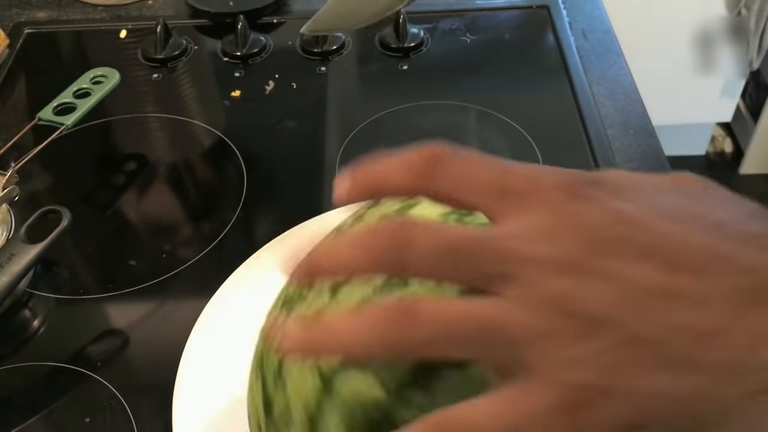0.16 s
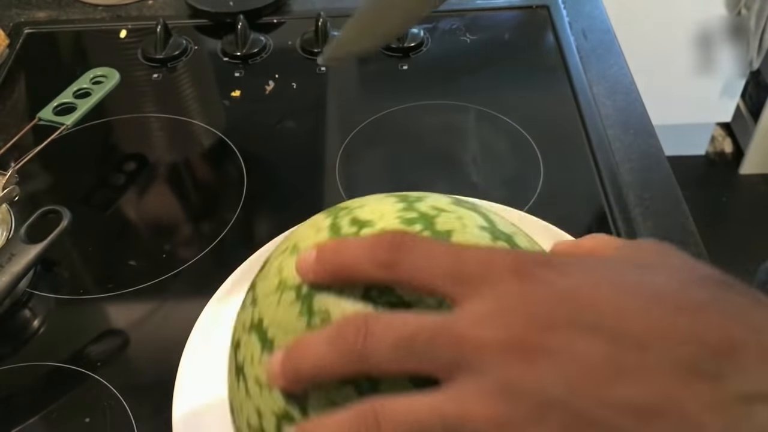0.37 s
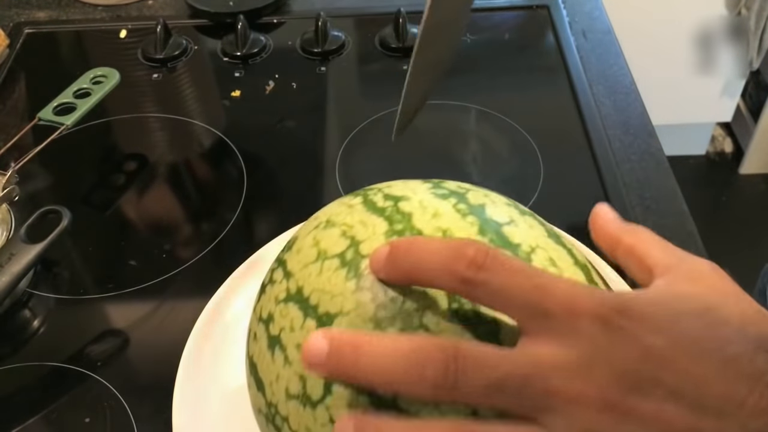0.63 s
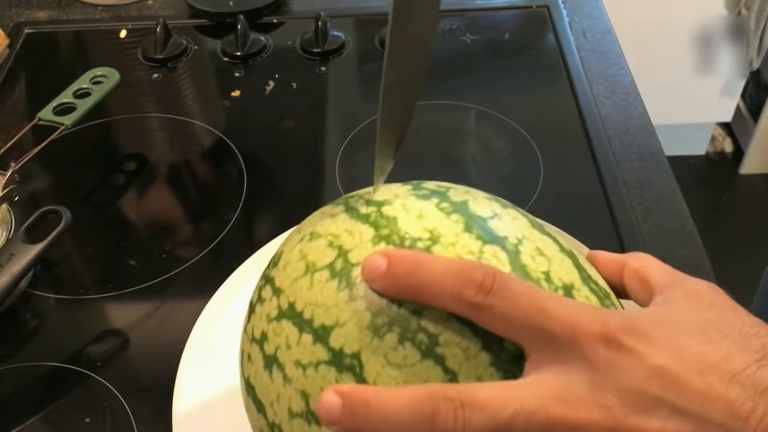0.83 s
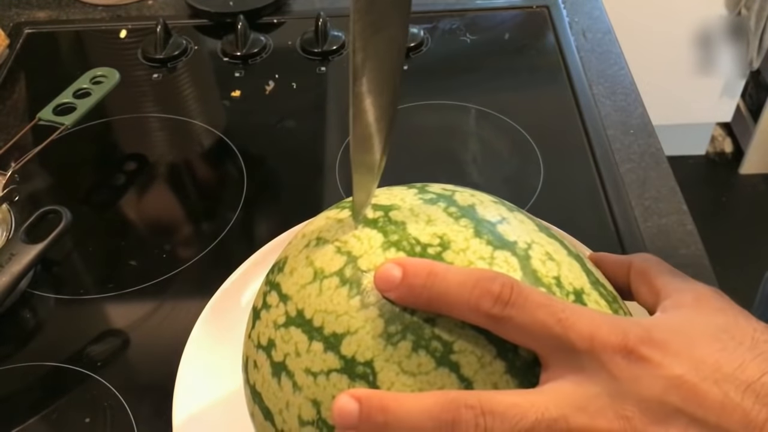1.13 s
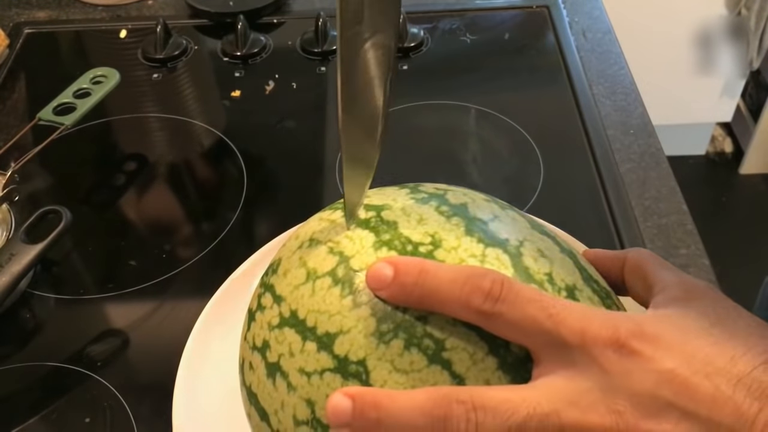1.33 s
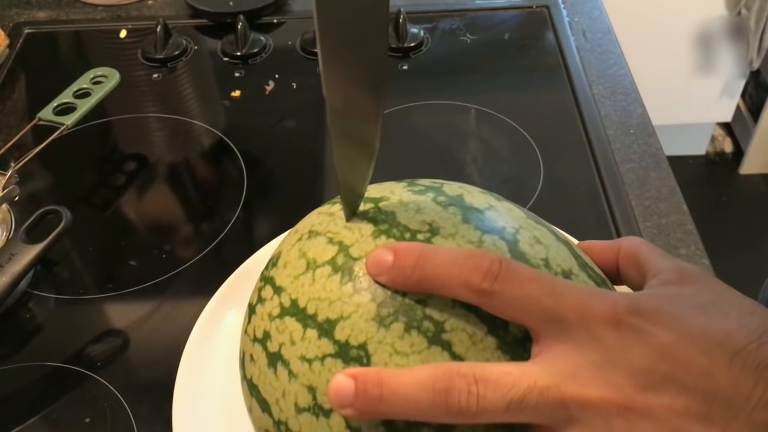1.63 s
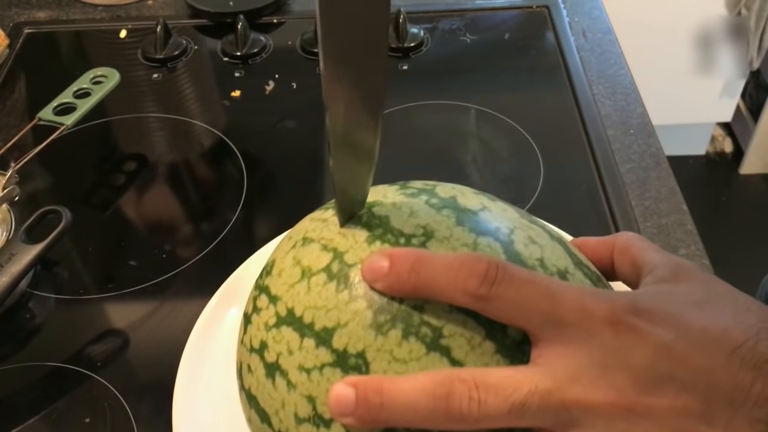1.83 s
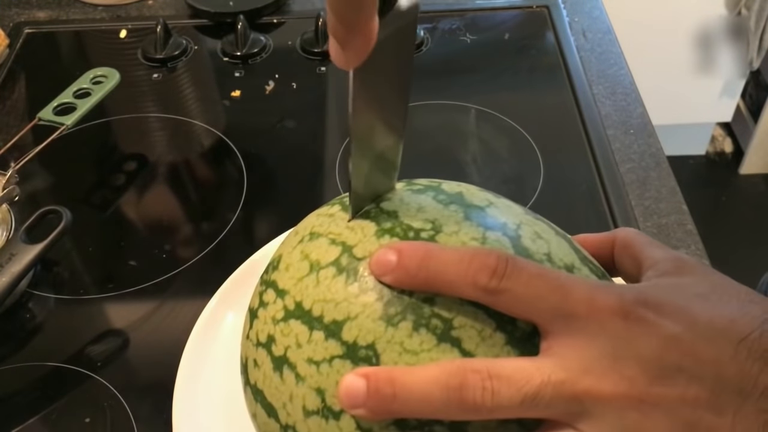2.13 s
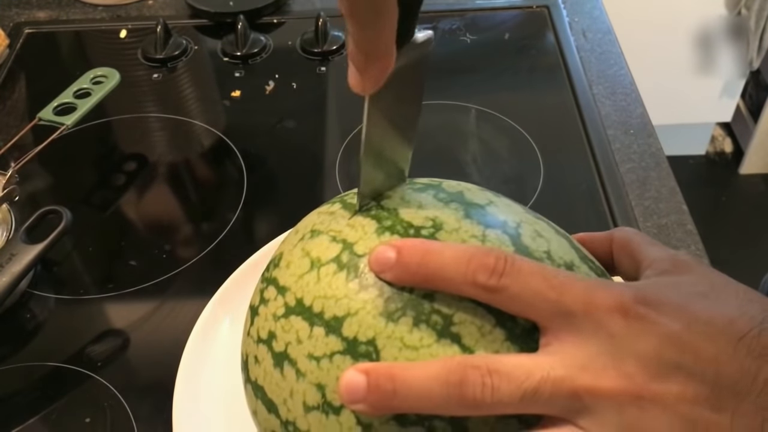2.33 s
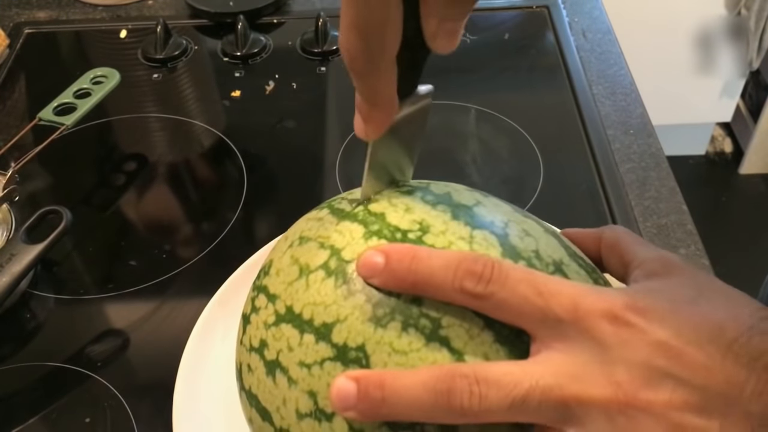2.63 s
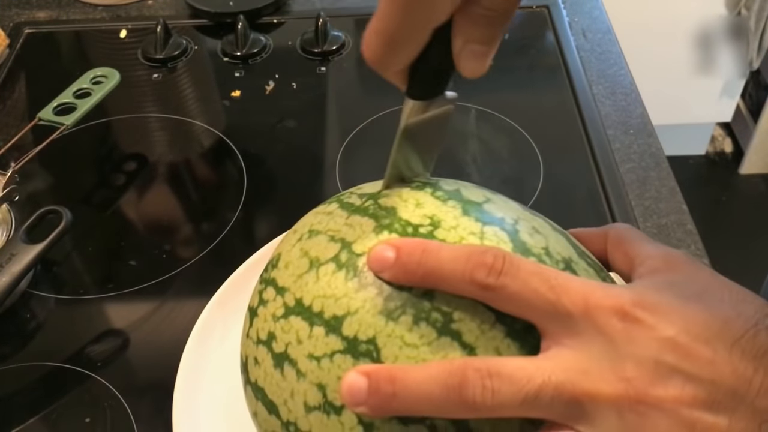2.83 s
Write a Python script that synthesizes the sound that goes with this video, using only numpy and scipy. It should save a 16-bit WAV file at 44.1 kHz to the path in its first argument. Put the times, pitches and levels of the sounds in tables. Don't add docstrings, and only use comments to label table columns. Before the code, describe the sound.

Wet, crisp crunches of a knife cutting watermelon rind, after dull plate thuds and light blade ticks

```python
import sys
import numpy as np
from scipy import signal
from scipy.fft import rfft, irfft, next_fast_len
from scipy.io import wavfile
from scipy.ndimage import uniform_filter1d, map_coordinates

SR = 44100
rng = np.random.default_rng(int(sys.argv[2]) if len(sys.argv) > 2 else 0)


def makeup_ratio(level_db):
    decades = np.asarray(level_db, float) / 20
    return 10 ** decades


def generate_wav(sig):
    pcm = np.round(np.clip(np.atleast_2d(sig).T, -1, 1) * 32767).astype(np.int16)
    wavfile.write(sys.argv[1], SR, pcm)


N = 131859
T = np.arange(N) / SR


def unit(x):
    return x / np.sqrt(np.mean(x ** 2) + 1e-20)


def along(points, hz):
    point_hz, value = np.transpose(points)
    return np.interp(np.log(hz + 1), np.log(point_hz + 1), value)


def wobble(rate):
    return map_coordinates(rng.standard_normal(int(N * rate / SR) + 4), [T * rate])


def filtered(x, response):
    size = next_fast_len(len(x) + 8192)
    return irfft(rfft(x, size) * response(np.fft.rfftfreq(size, 1 / SR)), size)[:len(x)]


def noise(spectrum, size):
    return unit(filtered(rng.standard_normal(size), lambda hz: makeup_ratio(along(spectrum, hz))))


def ring(modes, t, chance, spread_db):
    total = 0
    for k, ((hz, db, t60), c) in enumerate(zip(modes, chance)):
        decay = makeup_ratio(db + spread_db * c - 60 * t / t60)
        total = total + (-1) ** k * decay * np.sin(2 * np.pi * hz * t)
    return total


def add(track, s, x):
    part = track[round(s * SR):][:len(x)]
    part += x[:len(part)]


# time_s, level_db
RUMBLE_LEVEL = [(0.0, -37.5), (0.13, -29.5), (0.18, -45), (0.43, -27.5), (0.49, -32), (0.77, -43),
                (0.81, -23.5), (0.98, -50), (1.02, -22.5), (1.17, -36), (2.31, -31.5), (2.41, -22.5),
                (2.44, -36), (2.5, -24.5), (2.78, -26), (2.81, -39.5), (2.9, -22.5), (2.99, -32)]
# freq_hz, level_db (per Hz)
RUMBLE_COLOUR = [(12, -61), (20, -26), (36, -13), (59, 6), (72, 0), (86, -8), (124, -8.5), (200, -31),
                 (260, -70), (440, -120)]
# freq_hz, level_db (per Hz)
HISS_COLOUR = [(120, 0), (200, 1.5), (500, -5.5), (1100, -3), (2300, -12), (3000, -18.5), (6000, -22.5),
               (15800, -27)]
DRONE_HZ, DRONE_WANDER_HZ, DRONE_DB = 52.8, 4.1, 3
HISS_DB, HISS_SWAY_DB = -44.5, 0.5


def room_tone():
    time_s, level_db = np.transpose(RUMBLE_LEVEL)
    drone_hz = DRONE_HZ + DRONE_WANDER_HZ * wobble(9)
    drone = np.sqrt(2) * np.sin(2 * np.pi * np.cumsum(drone_hz) / SR)
    low = makeup_ratio(DRONE_DB) * drone + 0.84 * noise(RUMBLE_COLOUR, N)
    hiss = makeup_ratio(HISS_DB + HISS_SWAY_DB * wobble(6.28)) * noise(HISS_COLOUR, N)
    return makeup_ratio(np.interp(T, time_s, level_db)) * low + hiss


# freq_hz, t60_s
KITCHEN_DECAY = [(150, 0.62), (2000, 0.27), (10000, 0.23)]


def kitchen(x):
    hz, t, bins = signal.stft(rng.standard_normal(SR // 2), SR, nperseg=256)
    decay = makeup_ratio(-60 * t / along(KITCHEN_DECAY, hz)[:, None])
    tail = signal.istft(bins * decay, SR, nperseg=256)[1]
    delayed = np.pad(x, (200, 0))
    return signal.fftconvolve(delayed, tail / np.linalg.norm(tail))[:N]


# centre_s, half_width_s,
# level_db, colour_hz, colour_width_octaves
RUBS = [(.13, .035, -56, 10000, .9), (0.38, 0.098, -47.5, 1600, 1), (0.845, 0.053, -57, 5400, 1),
        (1.81, 0.055, -37, 800, 0.8), (1.83, .03, -45, 1170, .07), (1.86, .04, -45, 640, .15),
        (1.84, 0.048, -44, 224, 0.58), (2.36, 0.026, -37, 390, 0.76), (2.485, 0.023, -35.5, 350, 0.72),
        (2.80, 0.018, -43, 450, 0.37), (2.105, 0.018, -36.5, 410, .6), (0.61, 0.15, -39.5, 92, 0.38),
        (0.19, 0.16, -44.5, 105, 0.3), (2.88, 0.076, -44, 128, 0.36)]


def rubs():
    grain = makeup_ratio(2.1 * wobble(60.25))
    total = np.zeros(N)
    for centre, half_width, db, colour_hz, octaves in RUBS:
        colour = lambda hz: np.exp(-0.5 * (np.log2((hz + 1) / colour_hz) / octaves) ** 2)
        swell = np.exp(-0.5 * ((T - centre) / half_width) ** 2)
        total += makeup_ratio(db) * swell * unit(filtered(rng.standard_normal(N), colour))
    return grain * total


# start_s, level_db
TAPS = [
    (.815, -45),
    (.920, -36),
    (.952, -40),
    (1.052, -36),
]
# pitch_hz, level_db, t60_s
RIM = [(722, -1, 0.045), (2140, -1.5, 0.035), (2500, -8, .015), (3230, -9, 0.025), (3700, -15, .012)]


def taps():
    out, t = np.zeros(N), T[:SR // 8]
    for (s, db), c in zip(TAPS, rng.standard_normal((len(TAPS), len(RIM)))):
        roughness_db = 2.9 * noise([(300, -2), (900, -25), (2000, -90)], len(t))
        add(out, s, makeup_ratio(db + roughness_db) * ring(RIM, t, c, spread_db=1.5) * np.tanh(t / 0.0015))
    clink = ring([(561.6, 3.5, 0.24)], t, [0], spread_db=0)
    add(out, 0.098, makeup_ratio(-40.5) * clink * np.tanh(t / 0.004))
    return out


# start_s, level_db, scrape_s, ring_db, ring_tilt_db (per octave)
TICKS = [(.862, -54, .008, -14, 0), (1.019, -39, .02, -8, 2), (1.068, -62, .02, 6, -6),
         (1.262, -51, .02, -5, 3), (1.277, -46, .014, -5, 4), (1.463, -46, .015, -5, 4),
         (1.61, -55, .04, -3, 8), (1.635, -55, .03, -3, 8), (1.730, -46, .03, -12, 8),
         (1.754, -38, .008, -14, 8), (1.760, -32, .012, -16, 6), (1.946, -41, .016, -8, 6)]
# pitch_hz, level_db, t60_s
BLADE = [(5450, -4, .14), (5900, -9, .06), (6850, -4, .12), (7550, -8, .08), (8410, -5, .05),
         (9400, -2, .03), (10050, -5, .05), (11650, 2, .05), (13080, -2, .045), (13900, -1, .03),
         (14590, -9, .04), (15600, -3, .05)]


def ticks():
    out, t = np.zeros(N), T[:SR // 4]
    octaves = np.log2(np.array(BLADE)[:, 0] / 11000)
    for (s, db, scrape_s, ring_db, tilt_db), c in zip(TICKS, rng.standard_normal((len(TICKS), len(BLADE)))):
        scrape = noise([(2500, -42), (5000, -6), (15000, -9)], len(t)) * makeup_ratio(-26 * t / scrape_s)
        blade = ring(BLADE, t, c + tilt_db / 2 * octaves, spread_db=2)
        blade = blade * (1 - np.exp(-4 * t / scrape_s))
        blade = blade * makeup_ratio(3 * scrape / np.abs(scrape).max())
        add(out, s, makeup_ratio(db) * (scrape + makeup_ratio(ring_db) * blade))
    return out


# start_s, plate_db, boom_db, hardness_db (per octave)
KNOCKS = [
    (0.387, -7.5, -14, 2.5),
    (0.417, -25, -24, 7.5),
    (0.92, -32.5, -30, 0),
    (0.997, -11.5, -17, 1),
    (1.015, -37, -37, 2),
    (1.971, -11, -18.5, -0.5),
    (1.989, -23, -54.5, 2),
    (2.321, -19.5, -20.5, -1.8),
    (2.593, -13.5, -17, 2.7),
]
# start_s, plate_db, boom_db, hardness_db (per octave)
THUDS = [
    (0.776, -21, -24.5, 2),
    (1.743, -29.5, -24, -0.5),
    (2.080, -19, -18.5, 1),
    (2.26, -35, -39, 1),
    (2.456, -21, -19.5, 3.5),
    (2.786, -27, -27.5, 2),
]
# pitch_hz, level_db, t60_s
CLACK = [(669, -6.5, 0.067), (1384, 1, 0.027), (1627, 4.5, 0.021), (2134, -2, 0.022), (3300, -23, 0.015),
         (5060, -25, 0.011)]
DULL_CLACK = [(302, -10, 0.013), (467, 1, 0.016), (1220, -16, 0.014), (2360, -3, 0.015), (2930, -22, 0.017),
              (3900, -10.5, .012)]
# pitch_hz, level_db, t60_s
PLATE = [(546, 0.5, 0.14), (634.6, 4, 0.16), (818, -10.5, 0.16), (1225, -9.5, 0.18), (1361, -16, 0.36),
         (1607, 0, 0.16), (1570, -32, .12), (1770, -41, 0.11), (2330, -12, 0.28), (2300, -25.5, 0.1),
         (3330, -21.5, 0.26), (3460, -10, 0.025)]
DULL_PLATE = [(287, 9.5, 0.14), (457.3, 6, 0.22), (667, 4, 0.14), (826, 0.5, 0.088), (1221, 0.5, 0.13),
              (2195, -6, 0.3), (2310, -4, 0.12), (2897, -7.5, 0.082)]
# pitch_hz, level_db, t60_s
HOB = [(56.2, -6, 0.28), (90.3, -7.5, 0.3), (111.8, 2, 0.28), (145.1, -0.5, 0.18), (214.7, -3.5, 0.15),
       (275, -14, 0.24), (320, -15.5, 0.18), (380, -8, 0.1)]
# freq_hz, level_db (per Hz)
CHATTER = [(250, 2), (400, -0.5), (600, 4.5), (1000, -9), (1500, -3), (2300, -10), (2900, -24.5),
           (3500, -18)]
CHATTER_S, CHATTER_DB = 0.18, -11
CRACK_S, CRACK_DB = 0.036, -7
RING_DB, BOOM_RISE_S = -17.5, 0.007


def knocks(table, clack_modes, plate_modes):
    out, t = np.zeros(N), T[:SR // 2]
    for (s, db, boom_db, hard_db), c in zip(table, rng.standard_normal((len(table), 26))):
        lumps = makeup_ratio(1.76 * map_coordinates(rng.standard_normal(60), [t * 110]))
        chatter = noise(CHATTER + [(9000, -60)], len(t)) * lumps * makeup_ratio(CHATTER_DB - 60 * t / CHATTER_S)
        crack = noise([(800, 16), (2500, 11), (5000, -37), (9000, -30)], len(t))
        crack = crack * makeup_ratio(CRACK_DB - 60 * t / CRACK_S)
        clack = 0.5 * ring(clack_modes, t, c[20:], spread_db=1.5)
        plate_ring = makeup_ratio(RING_DB) * lumps * ring(plate_modes, t, c, spread_db=1.5)
        plate = (clack + chatter + crack + plate_ring) * (1 - np.exp(-t / 0.00066))
        hardness = lambda hz: makeup_ratio(hard_db * np.log2(np.clip(hz, 400, 5000) / 1400))
        boom = ring(HOB, t, c[12:], spread_db=2.03) * (1 - np.exp(-t / BOOM_RISE_S))
        add(out, s, makeup_ratio(db) * filtered(plate, hardness) + makeup_ratio(boom_db + 2.5) * boom)
    return out


# start_s, peak_db, pitch_hz, puff_db
SNAPS = [(1.798, -32, 7000, 0), (1.806, -34, 8000, 0), (1.833, -34, 7000, 0), (1.979, -24, 6800, -4),
         (2.022, -16, 6500, -7.5), (2.273, -28, 6500, -3), (2.326, -14, 6300, -7.5),
         (2.339, -12.5, 6557, -7.5), (2.442, -29, 7060, -7.5), (2.543, -30, 6500, -2),
         (2.558, -17.5, 6500, -7.5), (2.649, -30, 5858, -2), (2.657, -30, 6000, -2), (2.664, -32, 7400, 0),
         (2.680, -22, 6300, -7.5), (2.690, -35, 7000, -7.5), (2.739, -25.5, 6500, -6),
         (2.744, -28.5, 5800, -7.5), (2.7605, -30, 2200, 0), (2.783, -41, 9300, 3), (2.797, -48, 6000, 4),
         (2.832, -30, 6500, -2), (2.969, -41, 6000, -2), (2.988, -42, 6960, 2)]
SNAP_S = 0.0076


def snaps():
    out, t = np.zeros(N), T[:SR // 50]
    for s, db, hz, puff_db in SNAPS:
        puff = makeup_ratio(puff_db) * noise([(1500, -19), (5000, 6), (15000, -7)], len(t))
        add(out, s, makeup_ratio(db - 3 - 60 * t / SNAP_S) * (np.sin(2 * np.pi * hz * t) + puff))
    return out


CELLS_PER_S, CELL_HZ, CELL_OCTAVES = 1700, 6300, 0.49
CELL_CYCLES, CELL_SPREAD_DB = 2.2, 2


def cells():
    when, size, pitch = rng.random((3, 9000))
    keep = np.arange(9000) < CELLS_PER_S * N / SR
    octaves = CELL_OCTAVES * 1.86 * np.log(pitch / (1 - pitch)) / 3
    hz = np.clip(CELL_HZ * 2 ** octaves, 800, 15000)[:, None]
    size_db = -CELL_SPREAD_DB * np.log(1 - 0.98 * size)[:, None]
    t = T[:128]
    grain = makeup_ratio(size_db - 26 * t * hz / CELL_CYCLES) * np.sin(2 * np.pi * hz * t)
    at = (when * N).astype(int)[:, None] + np.arange(128)
    return unit(np.bincount(at.ravel(), (grain * keep[:, None]).ravel())[:N])


def patchy(x, depth_db):
    bins = signal.stft(x, nperseg=256)[2]
    field = uniform_filter1d(rng.standard_normal(bins.shape), size=4, axis=0)
    field = uniform_filter1d(field, size=12, axis=1)
    return signal.istft(bins * makeup_ratio(depth_db * unit(field)), nperseg=256)[1][:len(x)]


# start_s, bite_s, push_end_s, bite_db, end_db
STROKES = [
    (1.712, 0.055, 1.896, -37.5, -35),
    (1.948, 0.026, 2.152, -30, -36),
    (2.248, 0.031, 2.357, -32.5, -34),
    (2.524, .03, 2.689, -31.5, -36.5),
    (2.798, 0.044, 2.885, -32, -33),
]
# freq_hz, level_db (per Hz)
CRUNCH = [(180, -33), (300, -3), (853, -3.5), (1190, -3.5), (2720, -5), (6670, -3), (10400, -6.5),
          (15000, -5), (15800, -9.5)]
# pitch_hz, level_db, t60_s
HELD_BLADE = [(5450, -4, .05), (6850, 0, .06), (8410, -3, .04), (10050, -3, .04), (11750, -4, .04),
              (13500, -4, .04), (14590, 0, .05)]
BITE_DB, LIFT_DB_PER_S, ARCH_DB = 21.5, 650, 2
CELLS_DB, SING_DB = -3.5, -13
PATCHY_DB, FLUTTER_DB = 1.6, 0.9


def strokes():
    push = np.zeros(N)
    for s, bite, end, bite_db, end_db in STROKES:
        times = [s - 1, s, s + bite, (s + bite + end) / 2, end, end + 1]
        middle_db = (bite_db + end_db) / 2 + ARCH_DB
        start_db = bite_db - BITE_DB
        levels = [start_db - 896, start_db, bite_db, middle_db, end_db, end_db - LIFT_DB_PER_S]
        push += makeup_ratio(np.interp(T, times, levels))
    tear = makeup_ratio(CELLS_DB) * cells() + noise(CRUNCH, N) * makeup_ratio(1.05 * wobble(250))
    blade = ring(HELD_BLADE, T[:SR // 8], np.zeros(len(HELD_BLADE)), spread_db=0)
    sing = signal.fftconvolve(tear, blade)[:N]
    crunch = patchy(unit(tear) + makeup_ratio(SING_DB) * unit(sing), PATCHY_DB)
    return push * makeup_ratio(FLUTTER_DB * wobble(40)) * unit(crunch)


def scene():
    plate = knocks(KNOCKS, CLACK, PLATE) + knocks(THUDS, DULL_CLACK, DULL_PLATE)
    near = rubs() + taps() + ticks() + plate + snaps() + strokes()
    wet_db = -10.5
    return (near + makeup_ratio(wet_db) * kitchen(near) + room_tone())[None]


def top_cut(x):
    return signal.sosfilt(signal.butter(12, 16590, fs=SR, output="sos"), x)


def record(dry):
    low_cut_hz, top_hz = 30, 15750
    dip_hz, dip_width_hz, dip_db = 10300, 337, -3.5

    def microphone(hz):
        dip = makeup_ratio(dip_db * np.exp(-0.5 * ((hz - dip_hz) / dip_width_hz) ** 2))
        return dip * (hz < top_hz) * hz ** 2 / (hz ** 2 + low_cut_hz ** 2)

    return top_cut(filtered(dry[0], microphone)[None])


dry = scene()
out = record(dry)
generate_wav(out)
```